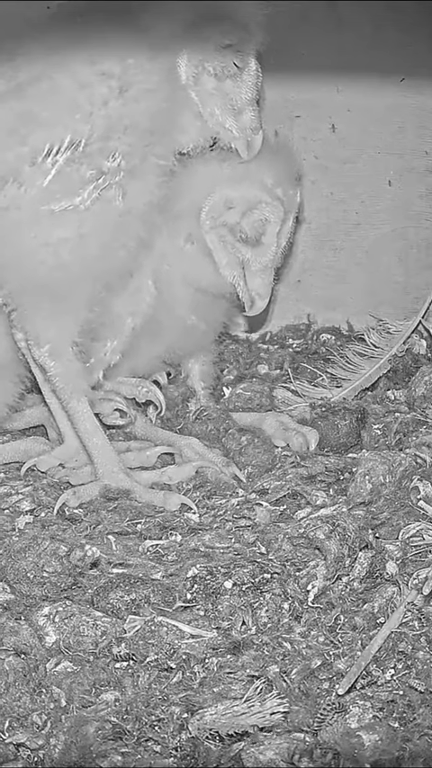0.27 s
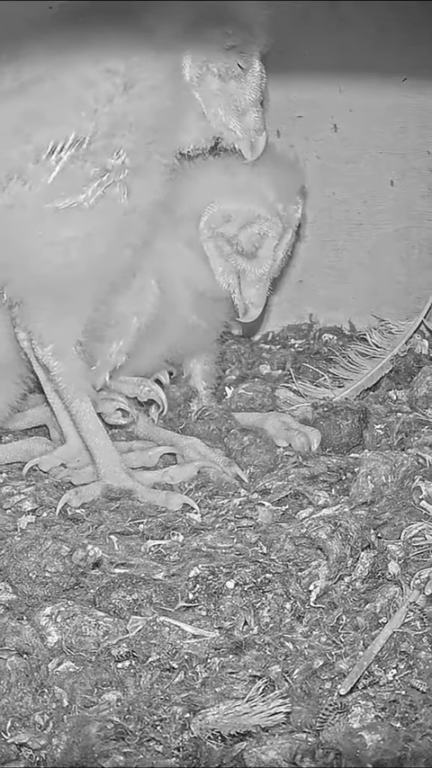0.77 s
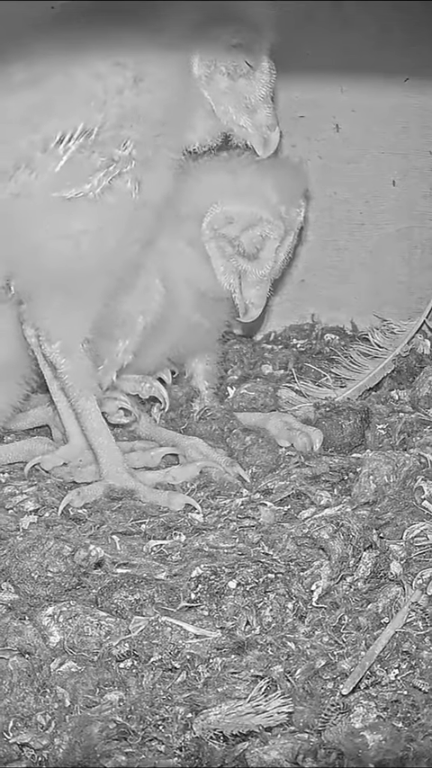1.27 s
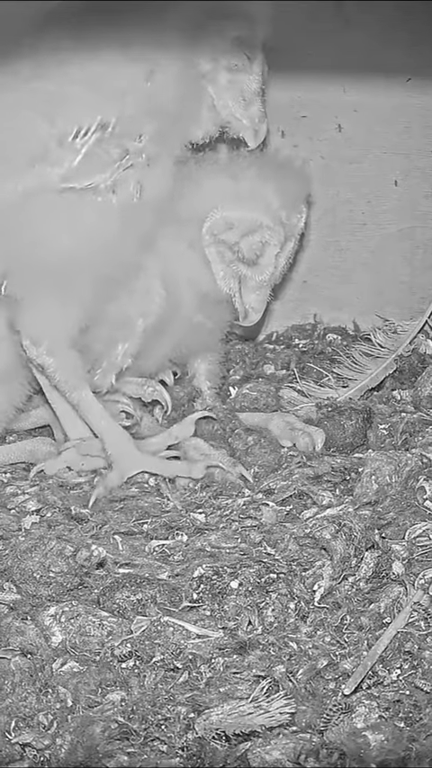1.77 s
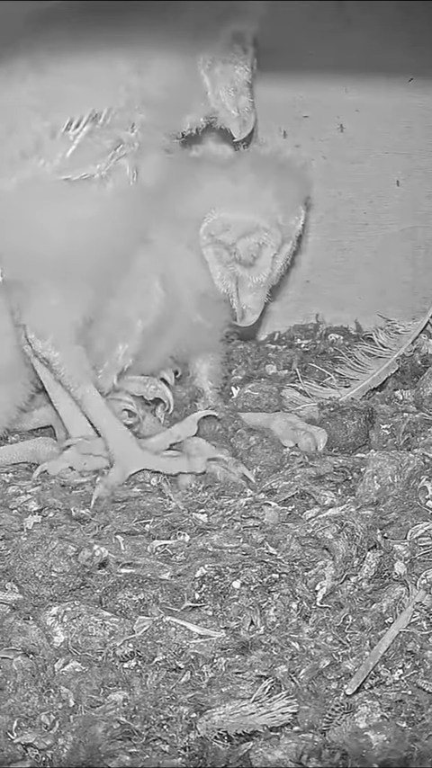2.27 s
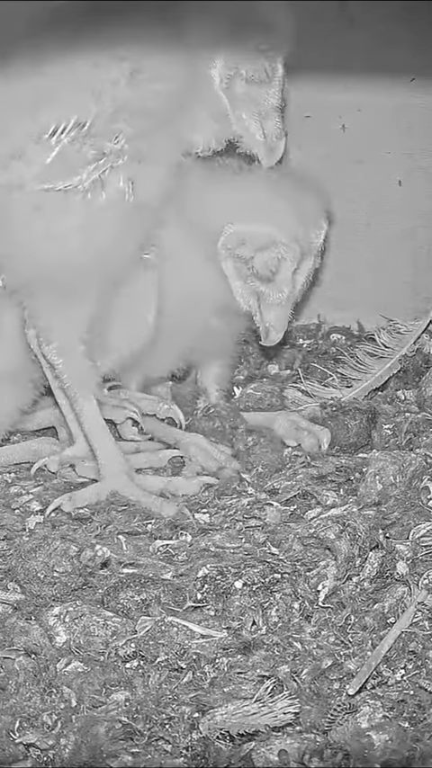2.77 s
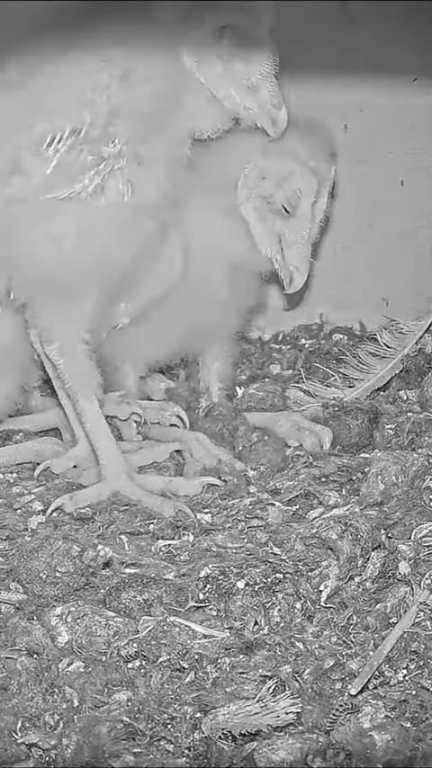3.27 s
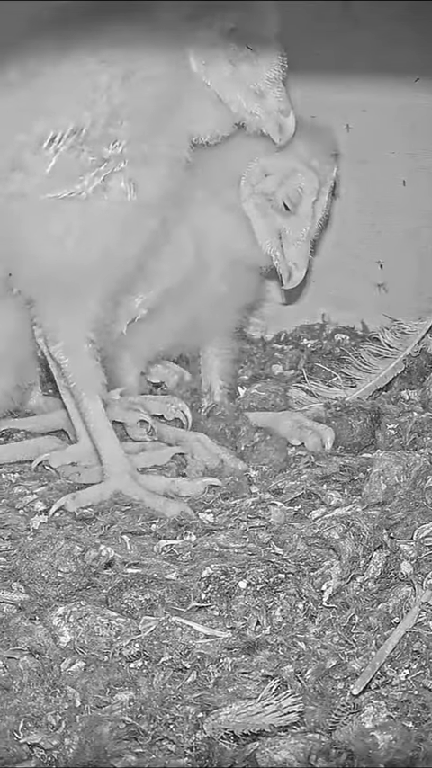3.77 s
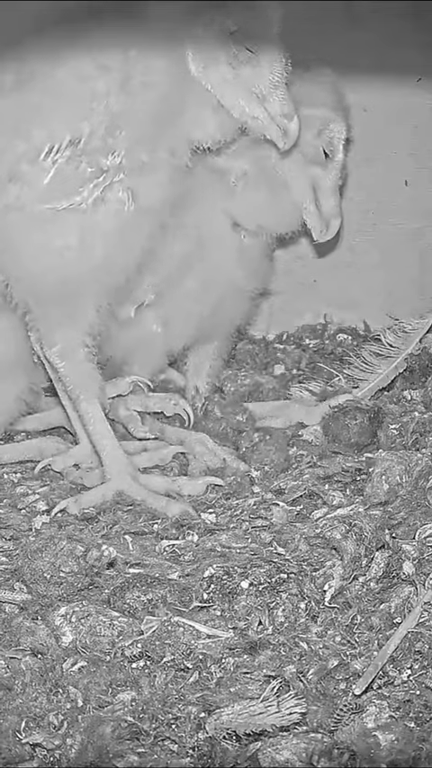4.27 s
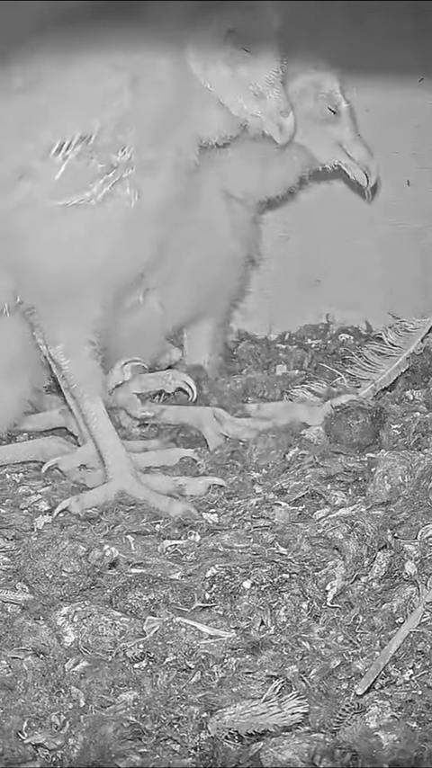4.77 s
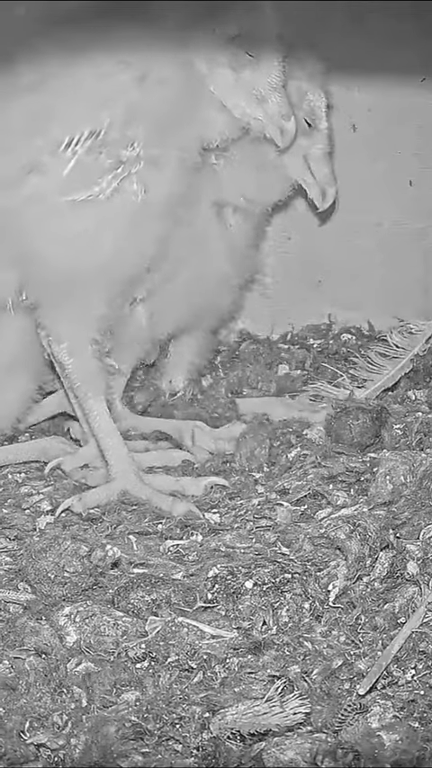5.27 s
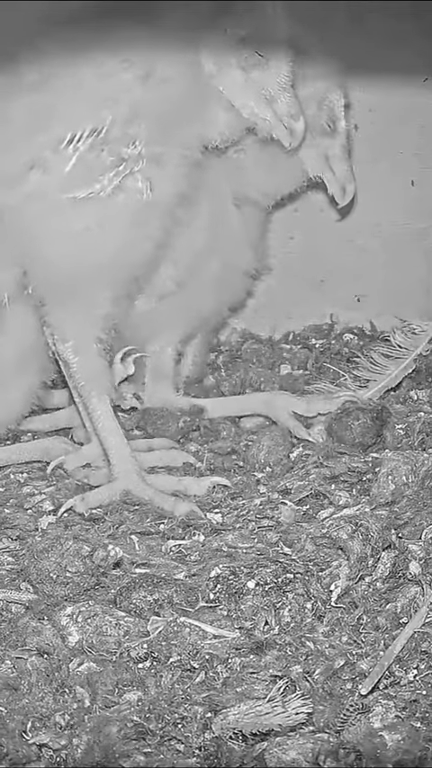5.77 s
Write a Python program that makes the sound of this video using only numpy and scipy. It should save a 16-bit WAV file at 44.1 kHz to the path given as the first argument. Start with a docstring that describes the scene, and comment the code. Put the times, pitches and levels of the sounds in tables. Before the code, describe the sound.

Close, boxy sound inside a wooden nest box, the same on both sides. At first there is only a low wavering drone, faint even hiss and barely perceptible deep bumps. At about 0.85 s a tiny sagging whistle leads into a harsh, rasping owl chick hiss, brightening as the beak opens and cutting off near 1.45 s. A second, longer hiss runs from 2.2 to 2.95 s, with faint foot taps beneath. A dull double knock with crunching litter comes at 3.25 s. The third hiss, sharp and sizzling, lasts from 3.7 to 4.45 s, over soft shuffling and a firm low knock at 4.2 s. More woody knocks follow at 4.6 s, with a gritty crunch, at 4.97 s, the strongest, and at 5.37 s. The fourth hiss, without a whistle, fills 5.4 to 6 s, with softer knocks and rumbling shuffles underneath.

```python
"""Owl chicks begging in a nest box

Inside a wooden box, one small microphone close to the chicks, the same signal on both channels.
Four long rasping hisses of filtered noise, three led in by a thin sagging whistle, ring in the hollow box.
Feet knock and shuffle on the boards (noise and impulses through floor modes) and litter crunches in grains.
Behind them lie slow low bumps of the box and a low wavering drone under a faint even hiss."""
import sys
import numpy as np
from scipy import signal
from scipy.fft import rfft, irfft
from scipy.io import wavfile
from scipy.ndimage import map_coordinates

SR = 44100
rng = np.random.default_rng(int(sys.argv[2]) if len(sys.argv) > 2 else 0)


def store_wav(level_fs):
    """Save 16-bit WAV to argv[1]."""
    pcm = np.round(np.clip(np.atleast_2d(level_fs), -1, 1) * 32767)
    wavfile.write(sys.argv[1], SR, pcm.T.astype(np.int16))


N = 264908

# hisses: start t/s, length t/s, time the beak takes to open t/s, then with the beak wide open:
# throat level/dB, edge level/dB, sizzle level/dB, sizzle centre f/Hz
HISSES = [(.878, .588, 0.5, -50.5, -47, -55, 8700), (2.186, 0.78, 0.36, -49, -45.5, -53.5, 7800),
          (3.703, 0.7344, 0.3, -45, -47.5, -51.5, 9500), (5.412, 0.609, 0.3, -47.5, -47.5, -54, 9200)]
# peaks and nulls that the pose of the head adds, one list a hiss: f/Hz, width f/Hz, level/dB
HEAD_POSES = [
    [(890, 110, 4), (2630, 520, -3), (3900, 200, 3.5), (5800, 200, -7), (8746, 100, -7)],
    [(1063, 84, 9), (1166, 44, -11), (2600, 250, 2), (3850, 440, 2.5), (4500, 56, 6.5), (5570, 150, 4),
     (8280, 140, 11), (11300, 500, 5.5)],
    [(1070, 160, -5.5), (3234, 55, 14), (3280, 60, -10), (4850, 130, 6.5), (5150, 490, -10), (5330, 68, 12),
     (5900, 180, 6), (6460, 92, 11), (14700, 600, -6)],
    [(2650, 120, -17), (3540, 130, 5.5), (3630, 100, -15), (4400, 130, 4), (5800, 270, -6), (5940, 84, 3),
     (11900, 200, 0), (12680, 250, 7)],
]
# spectrum of the air rushing in the throat: f/Hz, level/dB
THROAT = [(100, -34), (250, -8), (700, 2), (1100, 1.5), (2200, -1), (2900, -3.5), (4500, -3), (6000, -2),
          (7000, -6.5), (10000, -9), (11100, -14.5), (12000, -22), (15500, -29)]
# resonances and nulls of the air in the box: f/Hz, width f/Hz, level/dB
BOX_AIR = [(386, 30, 14), (516, 85, 12), (731.4, 172, 19.5), (813.2, 36, 12), (893, 122, -20.5),
           (1264, 110, 12), (1340, 37, -14), (1498, 66, 13.5), (1667, 40, -6), (1733, 252, 14),
           (2033, 130, 12), (2192, 67, 12.5), (2355, 117, 9), (2694, 98, -10.5), (2954, 41, -12),
           (3000, 250, 6), (3204, 51, -15), (3346, 40, -16), (3600, 56, -7), (3800, 34, 7.5),
           (3970, 45, 3.5), (4300, 110, -5), (4470, 78, 7.5), (4564, 75, -12), (4824, 200, 7.5),
           (5230, 470, 4), (6330, 120, 7.5), (6520, 174, -20.5), (7500, 340, 1), (8320, 270, -10.5),
           (9600, 440, 2), (10300, 160, 6)]
# squeaks as the throat narrows: t/s, length t/s, pitch f/Hz, level/dB, fall per harmonic level/dB
SQUEAKS = [(.838, 0.041, 2840, -71, -5), (2.161, 0.027, 2820, -66, -6), (3.682, 0.033, 2780, -73, -0.5)]
# foot knocks: t/s, level/dB relative to the full level in knock(), contact t/ms,
# mode that this spot favours or misses f/Hz, its level/dB
KNOCKS = [(2.462, -31, 6, 158, -7), (2.734, -20.5, 0.71, 178, 16), (3.251, -18, .9, 273, -6),
          (3.2725, -7.5, 1.6, 285, 6.5), (3.762, -29, 6.7, 123, 7), (4.197, -5.5, 0.31, 324, -5.5),
          (4.599, -15, 0.54, 478, 24.5), (4.6025, -8.5, 1.4, 213, -32.5), (4.607, -43, 0.15, 355, -8),
          (4.9725, -2.5, 0.95, 240, 5), (5.374, -7.5, 1.23, 293, 8), (5.587, -16, 1.9, 249, -7),
          (5.604, -16, 0.15, 504, 9), (5.703, -26.5, 2.5, 140, -1)]
# spectrum of a push on the boards: f/Hz, level/dB
THUD = [(30, -23), (70, 3), (110, -1.5), (180, 1.5), (330, -0.5), (420, -23.5), (540, -0.5), (650, -7),
        (900, -18), (1500, -54), (4000, -75)]
# modes of the floor boards: f/Hz, width f/Hz, level/dB
BOARD_MODES = [(88.5, 5, 12.5), (112.2, 15, 17), (129.6, 14, 13.5), (156.5, 15.7, 17), (193, 32, 2.5),
               (211.4, 9.7, 7), (253.7, 15, 6), (288, 19, 3.5), (336, 35, 9), (383.3, 12, 11),
               (439.5, 103, 18.5), (482.6, 42, 7)]
# litter crunching under the claws: t/s, length t/s, level/dB, tilt level/dB per octave
CRUNCHES = [(2.03, .04, -82, 15), (3.243, 0.043, -65.5, -2), (3.268, 0.029, -67.5, -1.5),
            (4.587, 0.017, -75, 7), (4.5985, 0.021, -57.5, -2), (4.68, .04, -76, 14),
            (4.9715, 0.03, -59.5, -2), (5.02, 0.052, -77, 0), (5.32, .07, -87, 0), (5.374, 0.011, -73, -10)]
# spectrum of dry litter: f/Hz, level/dB
LITTER = [(300, 1.5), (700, -6), (2000, 1.5), (4000, -2), (7000, -7.5), (10500, -12.5), (15000, -22)]
# soft low bumps of the box: t/s, level/dB relative to the full level in bump()
BUMPS = [(.39, -53.5), (.76, -59.5), (1.17, -54), (1.54, -56), (2.11, -56), (2.88, -53.5), (3.26, -53),
         (4.68, -56), (5.3, -55)]
# chicks shifting their weight on the boards: middle t/s, length t/s, level/dB
SHUFFLES = [(2.644, 1.7, -69), (3.74, 0.39, -59), (4.9, 2.5, -67), (5.7, 0.39, -58)]
# relative spectrum of the background: f/Hz, level/dB
BACKGROUND = [(20, -2.5), (45, -3), (80, -8), (170, -22.5), (350, -28.5), (600, -34), (950, -39.5),
              (1500, -36), (3000, -38.5), (4100, -41.5), (5800, -39), (7000, -45), (14000, -49),
              (15500, -52)]
# humps and thin whines of the background: f/Hz, width f/Hz, level/dB
DRONE = [(112.2, 27, 8.5), (204, 14, 12.5), (299, 69, 3.5), (340.3, 109, 15.5), (513, 124, 14),
         (764, 96, 16), (1194, 120, 5), (1624, 115, 9), (1670, 12, 10.5), (2230, 90, 3.5), (2500, 130, 6),
         (3090, 90, 7), (5030, 390, 10.5), (7400, 22, 6)]

BACKGROUND_DB = -60
BAND_EDGE_HZ = 15720
SIZE = 32768  # samples in a spectrum
HZ = np.fft.rfftfreq(SIZE, 1 / SR)
SAG = 0.03  # share of its pitch that a squeak loses by its end
# the air starts and stops quickly; the beak shuts just before it stops
ATTACK_S, RELEASE_S, SHUT_S = 0.012, 0.03, 0.075
# levels with the beak shut, the same for every hiss
SHUT_THROAT_DB, SHUT_EDGE_DB, SHUT_SIZZLE_DB = -51.5, -60, -65
# the centre of the sizzle moves as the beak parts
SHUT_SIZZLE_HZ, HALF_OPEN_SIZZLE_HZ = 7950, 9350
FLOW_POWER = 2.6  # the flow of air is nearly full well before the beak is wide open


def hiss(length, open_s, throat_db, edge_db, sizzle_db, open_hz, pose, rasp_db=0.37, rasp_hz=170,
         flutter_db=0.5, flutter_hz=35, jet_db=-5, jet_width_hz=1000):
    """Turbulent air in the throat; an edge and a sizzle grow as the beak opens, until it snaps shut."""
    t = np.arange(0, length, 1 / SR)
    attack = np.minimum(t / ATTACK_S, 1)
    release = np.minimum((length - t) / RELEASE_S, 1)
    opening = t / open_s
    shutting = (length - RELEASE_S - t) / SHUT_S
    gape = np.clip(np.minimum(opening, shutting), 0, 1)
    flow = 1 - (1 - gape) ** FLOW_POWER

    low, mid = below(2350), below(6870)
    throat = turbulence(pose, low, gape)
    edge = turbulence(pose, mid * (1 - low), gape)
    sizzle = turbulence(pose, 1 - mid, gape)
    # the gap of the beak lifts one moving part of the sizzle
    sizzle_hz = np.interp(gape, [0, 0.5, 1], [SHUT_SIZZLE_HZ, HALF_OPEN_SIZZLE_HZ, open_hz])
    jet = resonate(sizzle, sizzle_hz, jet_width_hz)
    sizzle = evened(sizzle + gain_of(jet_db) * jet)

    body = close(throat) * gain_of(SHUT_THROAT_DB + (throat_db - SHUT_THROAT_DB) * flow)
    treble = edge * gain_of(SHUT_EDGE_DB + (edge_db - SHUT_EDGE_DB) * gape)
    treble += sizzle * gain_of(SHUT_SIZZLE_DB + (sizzle_db - SHUT_SIZZLE_DB) * flow)
    rasp = rasp_db * wander(len(t), SR / rasp_hz)
    flutter = flutter_db * wander(len(t), SR / flutter_hz)
    # the treble needs more pressure and so dies first
    return attack * release * (body + treble * release) * evened(gain_of(rasp + flutter))


def turbulence(pose, share, gape, scatter_db=4.0, scatter_hz=60):
    """One band of rushing air; wall echoes comb its treble finely, and the comb changes with the gape."""
    colour = shape(THROAT, BOX_AIR + pose) + 10 * np.log10(share + 1e-8)
    depth_db = scatter_db * (1 - below(2950, order=2)) * below(15000, order=1)

    def combed():
        comb_db = depth_db * wander(len(HZ), scatter_hz / HZ[1])
        return noise(colour + comb_db, len(gape))

    shut, wide = combed(), combed()
    return shut * np.sqrt(1 - gape ** 2) + wide * gape


def close(air, length=0.09, open_hz=2300, shut_hz=1350, width_hz=300, depth=0.11):
    """As the beak shuts, part of the last air narrows into one falling, fuzzy whistle."""
    left_s = np.arange(len(air))[::-1] / SR
    shut = np.clip(1 - left_s / length, 0, 1)
    whistle = evened(resonate(air, open_hz + (shut_hz - open_hz) * shut, width_hz))
    share = depth * np.minimum(2 * shut, 1)
    return (1 - share) * air + share * whistle


def squeak(length, hz, db, fall_db, jitter=0.0094, top_db=-7, leak_db=1):
    """The narrowed throat whistles in four harmonics and sags, while more and more air leaks past."""
    u = np.linspace(0, 1, int(length * SR))
    pitch = hz * (1 - SAG * u ** 3) * (1 + jitter * wander(len(u), 122))
    turn = 2 * np.pi * np.cumsum(pitch) / SR
    tone = 0
    for k in range(4):
        harmonic_db = fall_db * k + top_db * max(k - 2, 0)  # the fourth is weakened further
        tone = tone + gain_of(harmonic_db) * np.sin((k + 1) * turn)
    tone = evened(tone * np.sin(np.pi * u) * u)
    leak_colour = shape(THROAT) + 10 * np.log10(1 - below(6500, order=2) + 1e-8)
    leak = noise(leak_colour, len(u)) * u ** 2
    return gain_of(db) * (tone + gain_of(leak_db) * leak)


def knock(db, contact_ms, spot_hz, spot_db, full_db=-16, spot_width_hz=110, lag_hz=170,
          shake_db=-27, shake_t60=0.3):
    """A foot pushes the boards and rings their modes; a longer contact weakens the upper ones."""
    softness_db = -20 * np.log10(1 + (2 * HZ * contact_ms / 1000) ** 2)
    colour = shape(THUD, BOARD_MODES + [(spot_hz, spot_width_hz, spot_db)]) + softness_db
    # bending waves are slower in the bass, which arrives a little late
    lag = (1j * HZ - lag_hz) / (1j * HZ + lag_hz)
    blow = irfft(rfft(ring(colour), SIZE) * lag)[:len(HZ)]
    t = np.arange(len(blow)) / SR
    # the walls take up the blow and shake on
    shake = noise(shape(THUD) + softness_db, len(t))
    shake *= gain_of(shake_db - 60 * t / shake_t60) * np.minimum(t / 0.0076, 1)
    return gain_of(db + full_db) * (blow / abs(blow).max() + shake)


def crunch(length, db, tilt_db, grain_db=3):
    """Dry litter gives way: a quick rise, then a grainy fade."""
    u = np.linspace(0, 1, int(length * SR))
    colour = shape(LITTER) + tilt_db * np.log2(HZ / 2000 + 0.11)
    grains = noise(colour, len(u)) * gain_of(grain_db * wander(len(u), 50))
    return gain_of(db) * evened(grains * u * (1 - u) ** 3)


def shuffle():
    """Each shift of weight swells and fades as a rumble of the boards."""
    t = np.arange(N) / SR
    power = 0
    for middle, length, db in SHUFFLES:
        swell = np.cos(np.pi * np.clip((t - middle) / length, -0.5, 0.5))
        power = power + (gain_of(db) * swell) ** 2
    return noise(shape(THUD, BOARD_MODES), N) * np.sqrt(power)


def bump(db, hz=43, length=0.19, full_db=-3.0):
    """A few slow swings of the whole box."""
    t = np.arange(0, length, 1 / SR)
    swing = np.sin(2 * np.pi * hz * rng.uniform(0.98, 1.03) * t)
    fade = t * (length - t) ** 2 * np.sin(np.pi * t / length)
    return gain_of(db + full_db) * evened(swing * fade)


def background(waver_db=3.0):
    """A low drone of shaped noise that wavers, under a faint even hiss."""
    steady = noise(shape(BACKGROUND, DRONE), N)
    low = signal.sosfiltfilt(signal.butter(2, 600, fs=SR, output="sos"), steady)
    waver = gain_of(waver_db * wander(N, SR / 9))
    return gain_of(BACKGROUND_DB) * (steady + low * (waver - 1))


def gain_of(db):
    """The amplitude factor of a level in dB."""
    return 10 ** (np.asarray(db) / 20)


def evened(x):
    """The signal scaled to rms 1."""
    return x / np.sqrt(np.mean(x ** 2) + 1e-20)


def shape(points, peaks=()):
    """A smooth spectrum in dB with resonances and nulls laid on it."""
    f, db = np.transpose(points)
    smooth = np.interp(np.log(HZ + 1), np.log(f), db)
    return smooth + sum(height / (1 + (2 * (HZ - hz) / width) ** 2) for hz, width, height in peaks)


def below(corner_hz, order=12):
    """The share of power under a crossover; a higher order is steeper."""
    return 1 / (1 + (HZ / corner_hz) ** (2 * order))


def ring(db):
    """The causal, minimum-phase impulse response that has this spectrum."""
    log_gain = np.log(gain_of(np.r_[db, db[-2:0:-1]]))
    return irfft(np.exp(np.conj(signal.hilbert(log_gain)))[:len(HZ)])


def noise(db, count):
    """Steady noise of rms 1 with this spectrum."""
    white = rng.standard_normal(count + SIZE - 1)
    return evened(signal.fftconvolve(white, ring(db), "valid"))


def wander(count, step):
    """Smooth chance of rms 1 that turns about once in every step samples."""
    knots = rng.standard_normal(count + 4)[:int(count / step) + 4]
    return evened(map_coordinates(knots, [np.arange(count) / step], order=2, mode="nearest"))


def resonate(x, hz, width_hz):
    """A resonance of gain 1 that follows the curve hz: shift down, smooth, shift back."""
    turn = np.exp(2j * np.pi * np.cumsum(hz) / SR)
    r = np.exp(-np.pi * width_hz / SR)
    return 2 * (turn * signal.lfilter([1 - r], [1, -r], x / turn)).real


def add(mix, s, sound):
    """Lay a sound into the mix from s seconds on, cut at the end of the mix."""
    part = mix[max(round(s * SR), 0):][:len(sound)]
    part += sound[:len(part)]


def scene():
    """The hisses and the small events over the background, alike on both channels."""
    mix = background() + shuffle()
    for (start, *row), pose in zip(HISSES, HEAD_POSES):
        add(mix, start, hiss(*row, pose))
    for table, source in (SQUEAKS, squeak), (KNOCKS, knock), (CRUNCHES, crunch), (BUMPS, bump):
        for start, *row in table:
            add(mix, start, source(*row))
    return np.array([mix, mix])


def record(dry):
    """One microphone on both channels, with a steep linear-phase band limit."""
    band = signal.firwin(711, BAND_EDGE_HZ, window=("kaiser", 9), fs=SR)
    return signal.oaconvolve(dry, band[None], "same")


dry = scene()
out = record(dry)
store_wav(out)
```